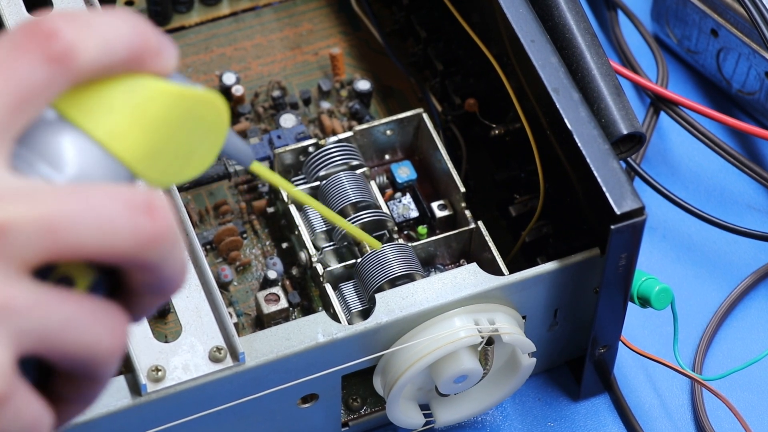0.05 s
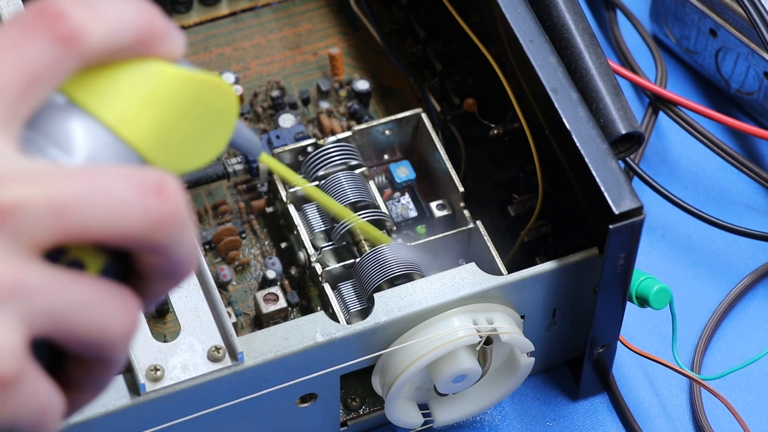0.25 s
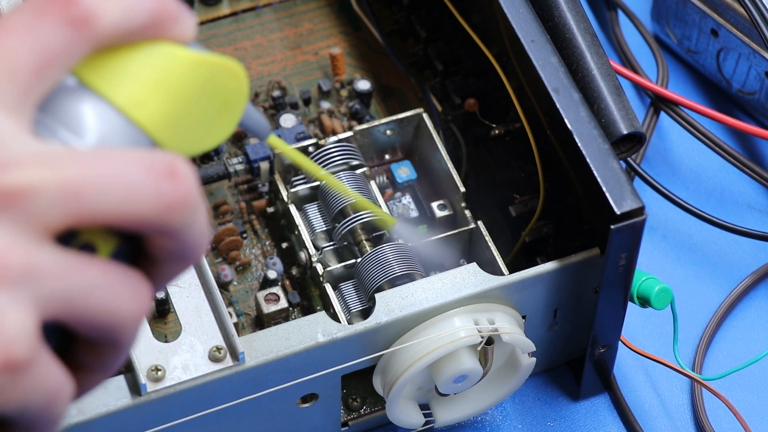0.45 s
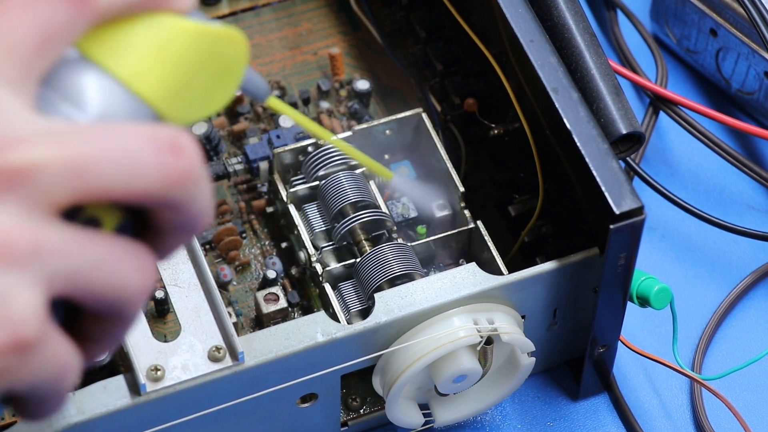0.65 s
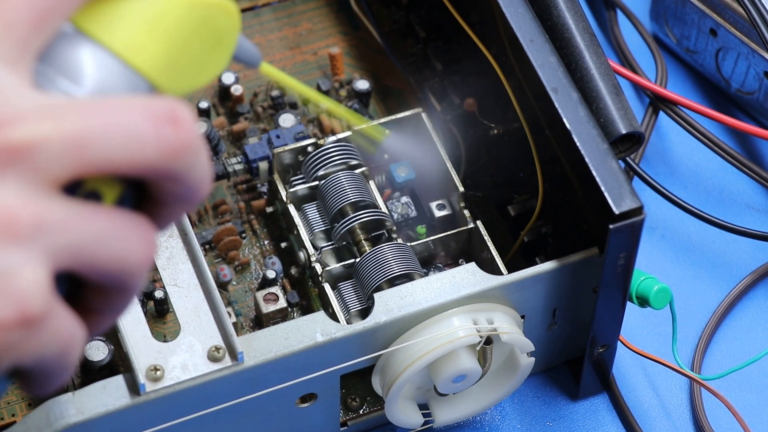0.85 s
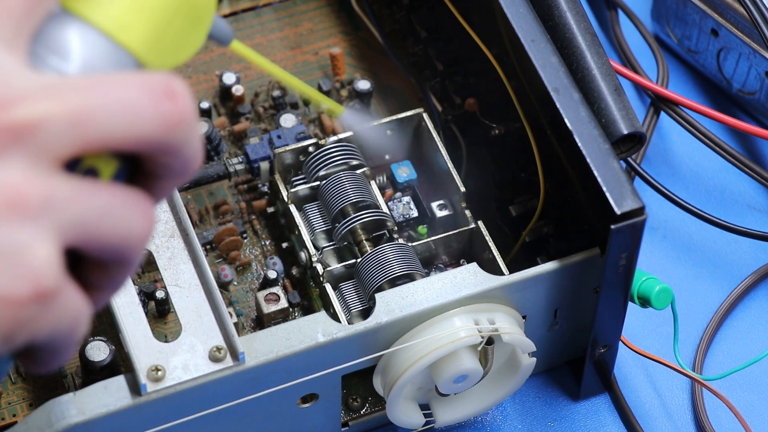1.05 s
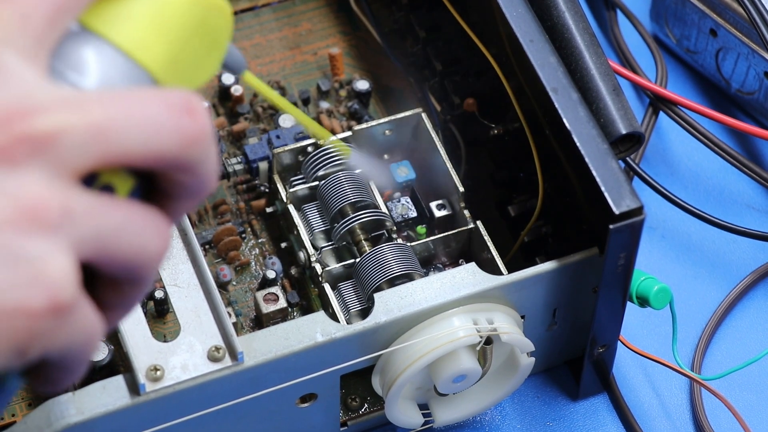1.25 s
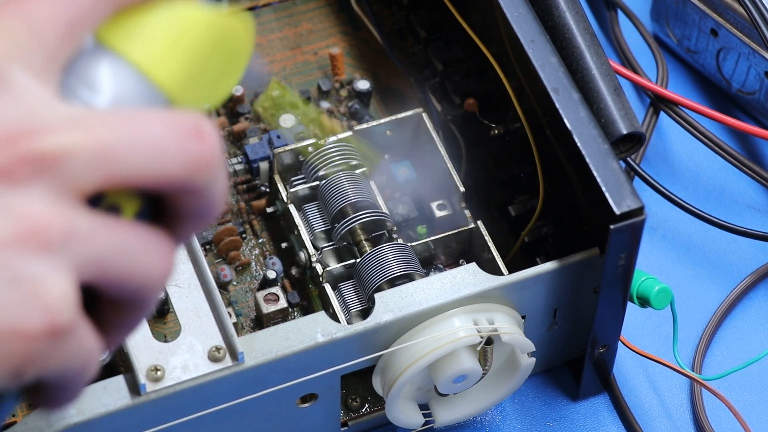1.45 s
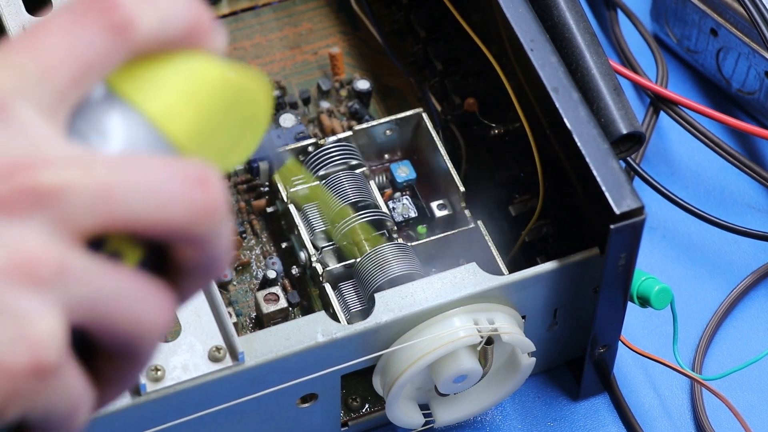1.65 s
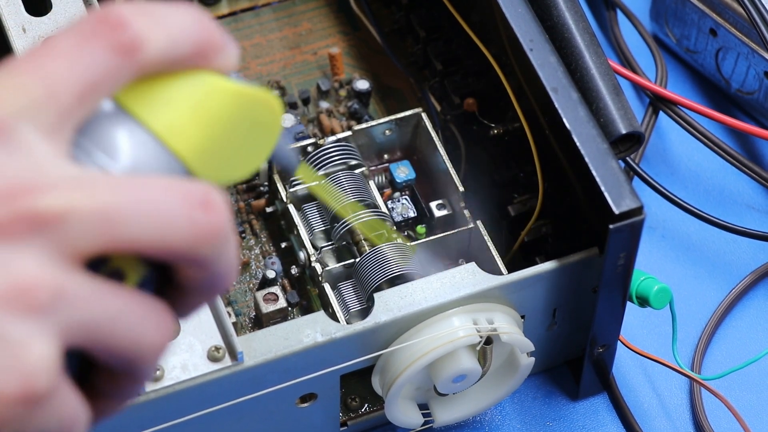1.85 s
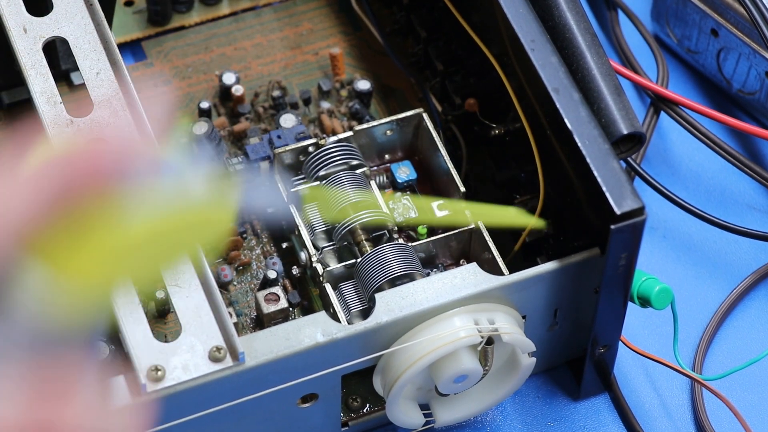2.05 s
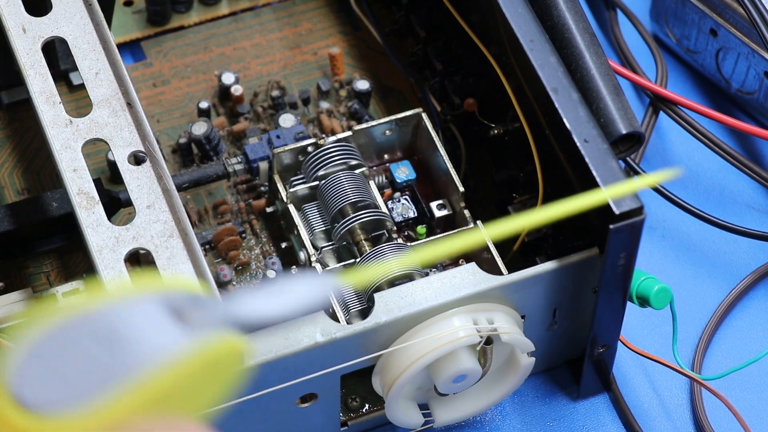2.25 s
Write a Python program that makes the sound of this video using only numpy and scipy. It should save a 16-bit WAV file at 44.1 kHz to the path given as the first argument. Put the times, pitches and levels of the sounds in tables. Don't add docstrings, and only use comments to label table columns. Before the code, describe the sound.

Aerosol spray starts with a brief whistle and light knocks, hisses brightly while sweeping over metal parts with shifting pitch, one harder knock midway, then cuts off with plastic ticks; close microphone, quiet workshop.

```python
import sys
import numpy as np
from scipy import signal
from scipy.io import wavfile

SR = 44100
rng = np.random.default_rng(int(sys.argv[2]) if len(sys.argv) > 2 else 0)


def bounce(signal):
    frames = np.transpose(np.atleast_2d(signal))
    limited = np.clip(frames, -1, 1)
    pcm = np.round(limited * 32767).astype(np.int16)
    wavfile.write(sys.argv[1], SR, pcm)


def decibels_to_gain(level_db):
    exponent = np.asarray(level_db, float) / 20
    return 10 ** exponent


N = 101429


def rms_one(x):
    return x / np.sqrt(np.mean(x ** 2) + 1e-20)


def at_hz(points, hz):
    table_hz, level_db = np.transpose(points)
    return np.interp(np.log(hz), np.log(table_hz), level_db)


def drift(rate):
    r = np.exp(-32 * np.pi * rate / SR)
    settle = 3000
    slow = signal.lfilter([1], [1, -2 * r, r * r], rng.standard_normal(N // 16 + settle + 2))[settle:]
    return np.interp(np.arange(N) / 16, np.arange(len(slow)), rms_one(slow))


def bell(middle, length):
    edge_power = 3.2
    away = (np.arange(N) / SR - middle) / (length / 2)
    return np.exp(-.5 * np.abs(away) ** edge_power)


def clicks(rows):
    s, db = np.transpose(rows)
    out = np.zeros(N)
    out[(s * SR).astype(int)] = decibels_to_gain(db)
    return out


def ring(strokes, hz, t60):
    r = decibels_to_gain(-60 / (t60 * SR))
    w = 2 * np.pi * hz / SR
    return signal.lfilter([0, np.sin(w)], [1, -2 * r * np.cos(w), r * r], strokes + 1e-18)


def peak(x, hz, width):
    r = np.exp(-np.pi * width / SR)
    feedback = [1, -2 * r * np.cos(2 * np.pi * hz / SR), r * r]
    return signal.lfilter((1 - r * r) / 2 * np.array([1, 0, -1]), feedback, x)


def sieve(x, order, hz, kind):
    return signal.sosfilt(signal.butter(order, hz, kind, fs=SR, output="sos"), x)


def bands():
    edges = 22 * 2 ** np.arange(0, 9.7, 1 / 3)
    white = rng.standard_normal((3, N))
    bank = []
    for k, (low, high) in enumerate(zip(edges, edges[1:])):
        bank.append((np.sqrt(low * high), sieve(white[k % 3], 2, [low, high], "band")))
    return bank


# (frequency [Hz], level [dB per Hz])
AIR_SPECTRUM = [(18, -41), (30, -11), (174, 0), (258, 0), (1120, -13), (1500, -15), (2110, -21),
                (14700, -28), (15900, -32)]


def still_air():
    level_db = -60
    noise = sum(decibels_to_gain(at_hz(AIR_SPECTRUM, hz)) * v for hz, v in bands())
    return decibels_to_gain(level_db) * rms_one(noise)


def workshop(x):
    t60_s, wall_cut_hz = 0.32, 5600
    dull = np.exp(-2 * np.pi * wall_cut_hz / SR)
    out = np.zeros(N)
    lags = (rng.uniform(.012, .04, size=10) * SR).astype(int)
    for k, lag in enumerate(lags):
        loop, state = x.copy(), [0.]
        gain = decibels_to_gain(-60 * lag / SR / t60_s)
        for i in range(lag, N, lag):
            back, state = signal.lfilter([gain * (1 - dull)], [1, -dull], loop[i - lag:i], zi=state)
            loop[i:i + lag] += back[:N - i]
        out += (loop - x) * (-1) ** k
    return out


# (middle [s], length [s], level [dB], top [Hz])
HAND_RUSTLE = (2.16, .1, -48, 4000)


def rustle():
    middle, length, db, top_hz = HAND_RUSTLE
    dull_noise = signal.lfilter([1], [1, -.9], rng.standard_normal(N))
    rub = rms_one(sieve(dull_noise, 2, [140, top_hz], "band"))
    return decibels_to_gain(db + 2.5 * drift(60)) * bell(middle, length) * rub


# (time [s], level [dB])
RELEASE_TICKS = [(2.1248, -38), (2.14, -44), (2.1476, -33), (2.1586, -36), (2.1648, -30), (2.1698, -33),
                 (2.1826, -35), (2.186, -36), (2.1913, -32), (2.2006, -34), (2.218, -44), (2.2455, -39)]


def release_ticks():
    body_hz, body_t60_s, body_db = 520, .008, -5
    ticks = signal.lfilter(np.hanning(11), 1, clicks(RELEASE_TICKS))
    return 1.1 * ticks + decibels_to_gain(body_db) / 3 * ring(ticks, body_hz, body_t60_s)


# (time [s], level [dB])
BENCH_BOOMS = [
    (.24, -49),
    (.29, -47.5),
    (.899, -37.5),
]


def bench_boom():
    hz, rise_t60_s, t60_s = 129, .05, .35
    blows = clicks(BENCH_BOOMS)
    return 2 * (ring(blows, hz, t60_s) - ring(blows, hz, rise_t60_s))


# (time [s], level [dB])
CAN_KNOCKS = [(.228, -36), (.238, -36), (.25, -33), (.365, -37), (.8968, -18), (.911, -37.5), (.923, -29),
              (1.05, -44.5), (1.4, -47), (1.49, -45), (1.75, -46.5)]
# (frequency [Hz], level [dB], t60 [s])
CHASSIS_MODES = [(261.4, -41, 0.15), (335, -10, 0.089), (400, 3, .03), (474.1, 5.5, 0.014),
                 (650, -1.5, 0.018)]


def chassis_knocks():
    soft = signal.lfilter(np.hanning(44) / 22, 1, clicks(CAN_KNOCKS))
    modes = sum(decibels_to_gain(db) * ring(soft, hz, t60) for hz, db, t60 in CHASSIS_MODES)
    return sieve(modes, 2, 230, "high")


# (middle [s], length [s], level [dB], frequency [Hz], width [Hz])
STRAW_WHISTLES = [
    (0.172, 0.027, -43.5, 3240, 400),
    (0.253, 0.093, -38.5, 3430, 356),
    (0.239, 0.068, -38, 5070, 504),
    (0.171, 0.041, -46, 8200, 298),
    (0.178, .05, -56.5, 1690, 400),
    (1.425, 0.25, -34, 11030, 678),
]


def whistles():
    out = 0
    for middle, length, db, hz, width in STRAW_WHISTLES:
        tone = peak(peak(rng.standard_normal(N), hz, width), hz, width)
        out = out + decibels_to_gain(db) * bell(middle, length) * rms_one(tone)
    return out


# (delay [s], wander [s], gain [ratio])
CHASSIS_WALLS = [(.0013, 0.00037, .2), (.0027, .0006, .25), (.0045, .0008, .25)]


def walls(x):
    n = np.arange(N)
    out = x
    for lag, wander, gain in CHASSIS_WALLS:
        delay = np.round(SR * (lag + wander * drift(4)))
        out = out + gain * np.interp(n - delay, n, x, left=0)
    return out


# (time [s], level [dB])
VALVE_LEVEL = [(.137, -64), (.158, -46), (.2, -36.5), (.27, -29.5), (.33, -28), (.54, -28.5), (.58, -28),
               (.69, -27), (.82, -28), (.92, -28), (1.05, -28.5), (1.14, -28.5), (1.22, -29.5), (1.62, -26),
               (1.7, -26), (1.78, -26), (1.96, -28), (2.03, -36.5)]
# (frequency [Hz], level [dB per Hz])
JET_COLOUR = [(59, -44), (100, -22.5), (229, -15.5), (423, -9), (1330, -8.5), (1540, -5), (2310, -8.5),
              (7580, -1.5), (15900, -7.5)]
# (middle [s], length [s], level [dB], centre [Hz])
STRUCK_PARTS = [(0.328, 0.026, -29, 2800), (0.412, 0.068, -27, 5400), (0.527, 0.048, -25, 1740),
                (0.526, 0.054, -22, 5030), (.575, 0.031, -21, 7400), (0.624, 0.052, -21, 5400),
                (0.682, 0.04, -21.5, 3550), (0.75, 0.15, -26, 2800), (0.814, 0.089, -19.5, 6700),
                (0.879, 0.011, -20, 3500), (0.924, .07, -24, 1810), (0.958, 0.032, -26, 4080),
                (1.018, 0.15, -21.5, 7900), (1.102, 0.11, -25, 5230), (1.124, 0.065, -23, 1890),
                (1.212, 0.072, -18, 6700), (1.302, 0.09, -21, 5400), (1.315, 0.073, -23.5, 2800),
                (1.458, 0.024, -20, 4400), (1.5, 0.092, -26.5, 2020), (1.541, 0.046, -19, 4500),
                (1.62, 0.056, -23.5, 6200), (1.642, 0.02, -19, 4150), (1.679, 0.082, -24, 2910),
                (1.807, 0.057, -19, 5300), (1.884, 0.039, -20, 3100), (1.917, 0.03, -16.5, 4260),
                (1.987, 0.037, -23.5, 1950), (2.024, 0.11, -40.5, 556), (0.172, 0.038, -47.5, 2800)]
# (frequency
# [Hz], width [Hz], gain [ratio])
CAVITY_MODES = [(401, 110, 0.52), (1170, 80.3, 0.59), (1640, 330, 0.28), (2070, 130, 0.27),
                (2800, 180, 0.16), (3540, 177, 0.46), (4650, 530, 0.45), (5570, 300, 0.6),
                (7320, 600, 0.54), (8930, 660, 0.24), (10010, 710, -0.14), (11340, 290, 0.29),
                (15500, 500, .5)]


def jet(slow_db, sputter_db, own_db):
    lift_db, full_db = 4, -43.5
    shut_s, shut_db_per_s = 2.0366, 296
    t = np.arange(N) / SR
    s, db = np.transpose(VALVE_LEVEL)
    shutting_db = shut_db_per_s * np.maximum(t - shut_s, 0)
    valve = decibels_to_gain(lift_db + np.interp(t, s, db, left=-90) - shutting_db)
    thin = np.where(t < 1, np.minimum(valve / decibels_to_gain(full_db + lift_db), 1), 1)
    closing = np.where(t > 1.97, np.minimum(valve / decibels_to_gain(db[-2] + lift_db), 1), 1)

    bank = bands()
    colour = np.array([decibels_to_gain(at_hz(JET_COLOUR, hz)) for hz, _ in bank])
    colour = colour / np.sqrt(sum(g ** 2 * np.mean(v ** 2) for g, (_, v) in zip(colour, bank)))

    swells = np.array([decibels_to_gain(level) * bell(middle, length) for middle, length, level, _ in STRUCK_PARTS]) ** 2
    centre_hz = np.array(STRUCK_PARTS)[:, 3]
    shade = 4 * (centre_hz < 3000) @ np.sqrt(swells)
    low_narrowing = (centre_hz / 4000) ** 0.15

    shared_db = slow_db * drift(37) + sputter_db * drift(170)
    out = 0
    for g, (hz, noise) in zip(colour, bank):
        away = np.log2(hz / centre_hz)
        octaves = np.where(away < 0, 0.76, 0.66)
        away = away / octaves / low_narrowing
        struck_power = (np.exp(-away ** 2) * SR / 2 / centre_hz / 1.51) @ swells
        treble_lead = 0.28 / (1 + (6000 / hz) ** 2)
        bass_lag = 2.5 / (1 + (hz / 1200) ** 4)
        free = g * valve * closing ** treble_lead * thin ** bass_lag
        free_power = free ** 2 / (1 + shade * hz / (hz + 7600.0))
        unsteady = decibels_to_gain(shared_db + own_db * drift(25))
        out = out + np.sqrt(free_power + struck_power) * unsteady * noise
    for hz, width, gain in CAVITY_MODES:
        out = out + gain * peak(out, hz, width)
    return out


def scene():
    room_db, side_db = -15, -73.5
    spray = walls(jet(slow_db=1.0, sputter_db=0.0, own_db=1.2)) + whistles()
    near = spray + chassis_knocks() + bench_boom() + release_ticks() + rustle()
    air = still_air()
    room = decibels_to_gain(room_db) * workshop(near)
    side = decibels_to_gain(side_db) * rng.standard_normal(N) * [[1], [-1]]
    return near + room + air + side


def top_cut(x):
    return signal.sosfilt(signal.butter(12, 16090, fs=SR, output="sos"), x)


def record(dry):
    low_hz, top_hz = 40.5, 15830
    x = sieve(dry, 1, low_hz, "high")
    steep = signal.ellip(14, .3, 80, top_hz, fs=SR, output="sos")
    return top_cut(signal.sosfilt(steep, x))


dry = scene()
out = record(dry)
bounce(out)
```